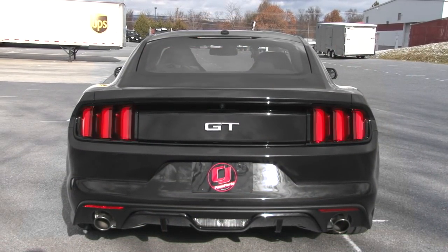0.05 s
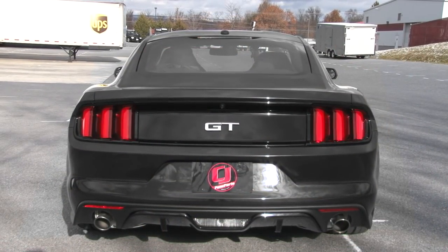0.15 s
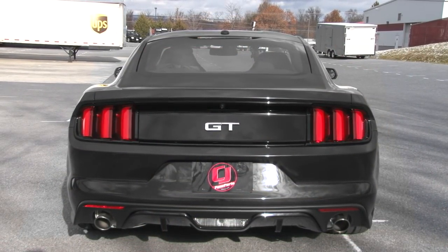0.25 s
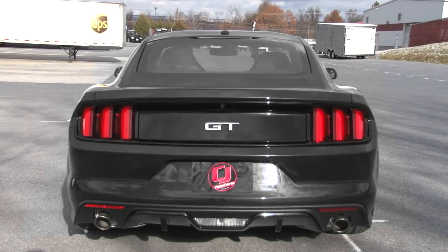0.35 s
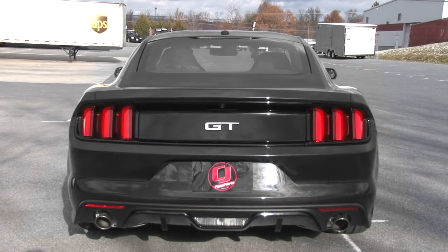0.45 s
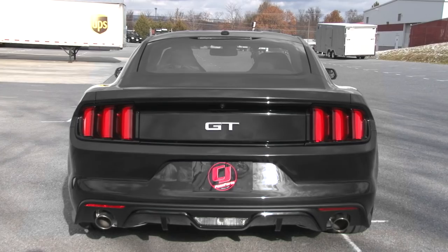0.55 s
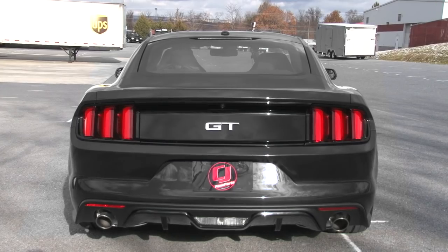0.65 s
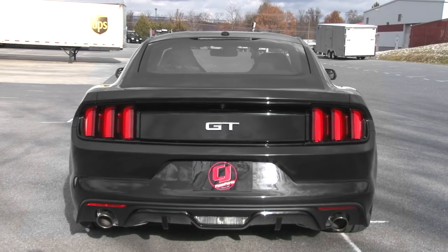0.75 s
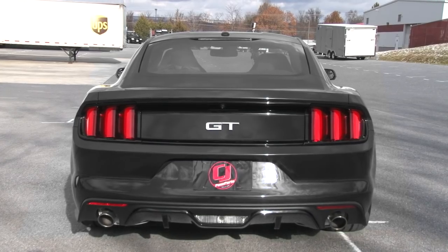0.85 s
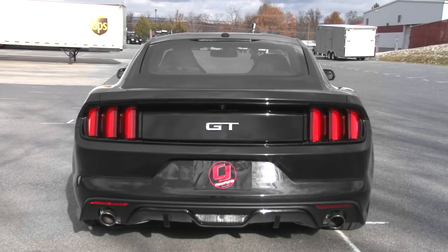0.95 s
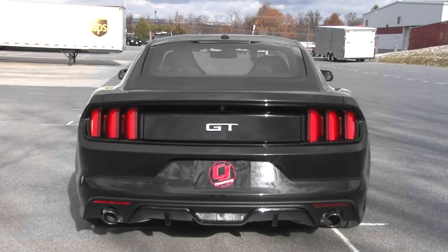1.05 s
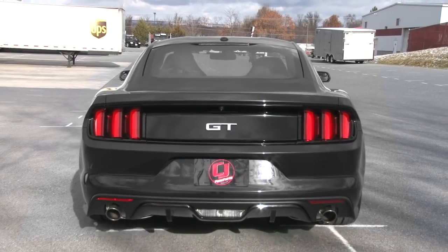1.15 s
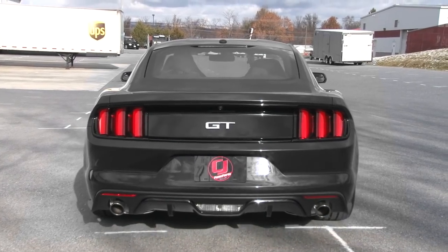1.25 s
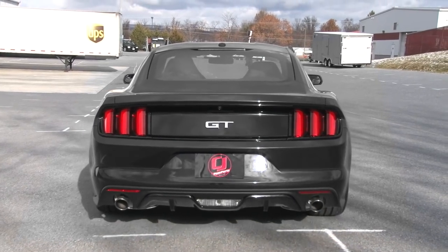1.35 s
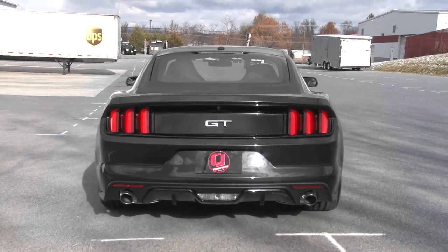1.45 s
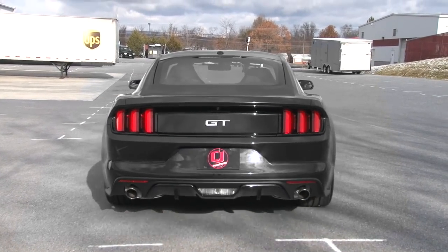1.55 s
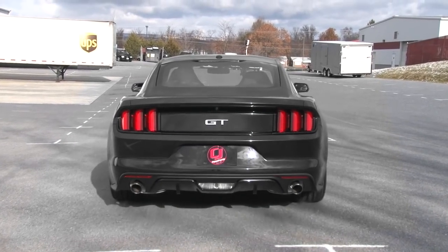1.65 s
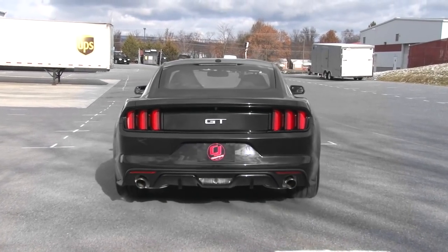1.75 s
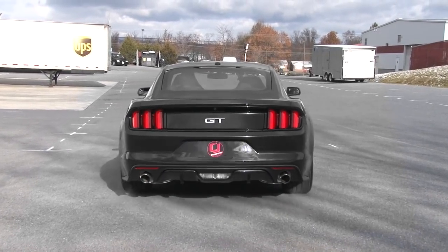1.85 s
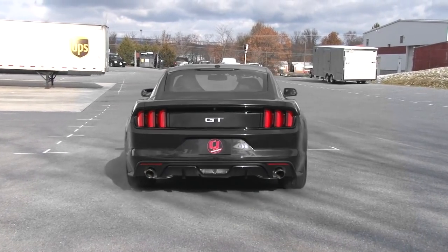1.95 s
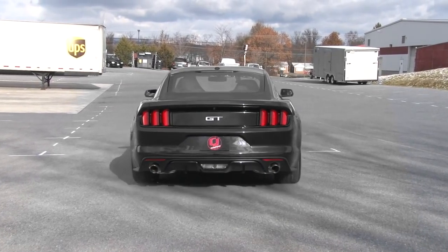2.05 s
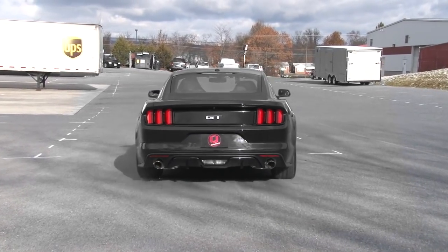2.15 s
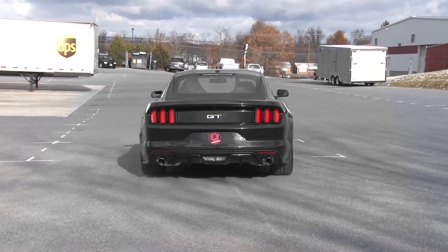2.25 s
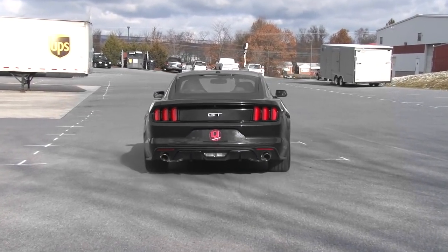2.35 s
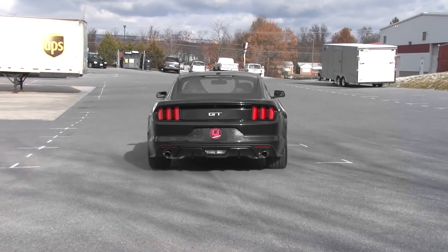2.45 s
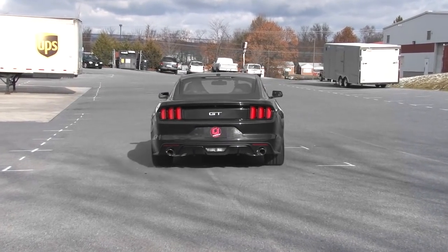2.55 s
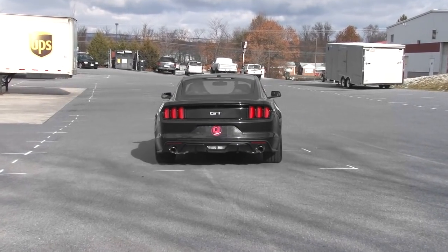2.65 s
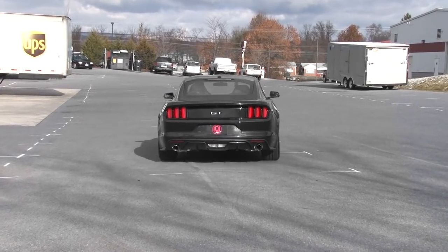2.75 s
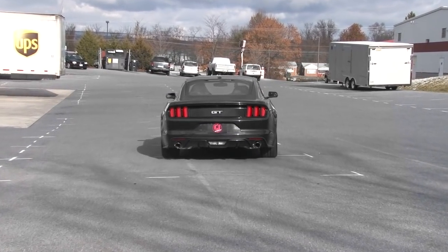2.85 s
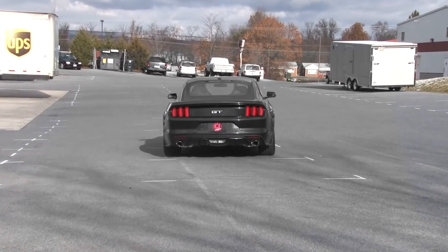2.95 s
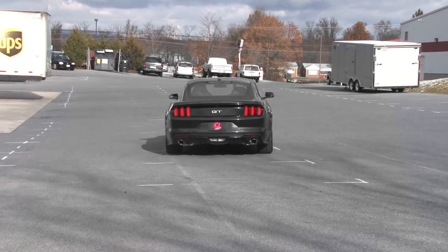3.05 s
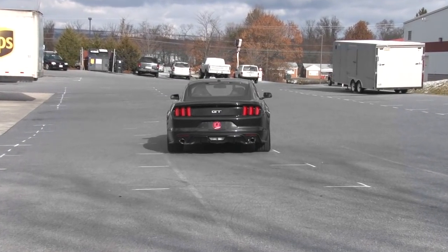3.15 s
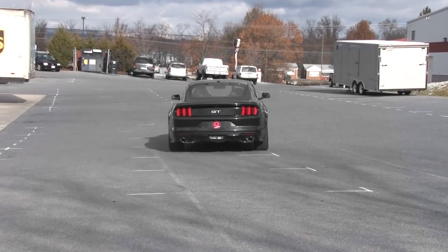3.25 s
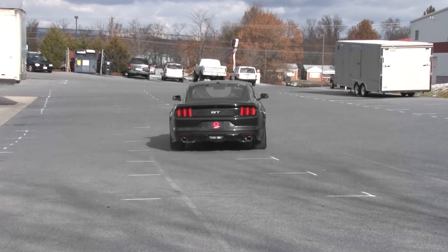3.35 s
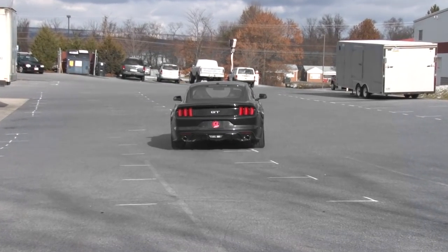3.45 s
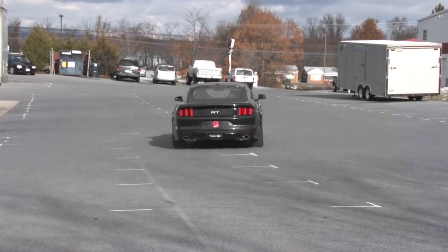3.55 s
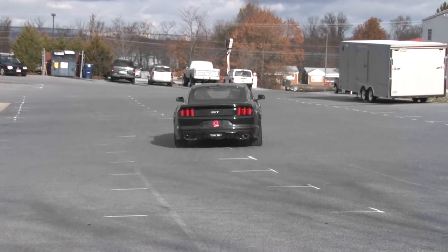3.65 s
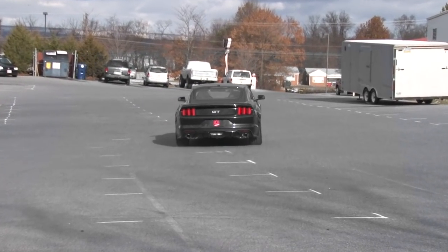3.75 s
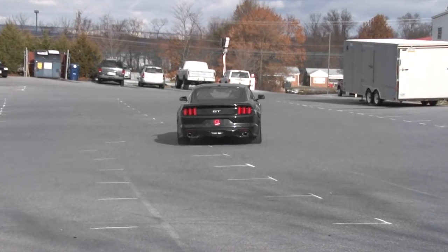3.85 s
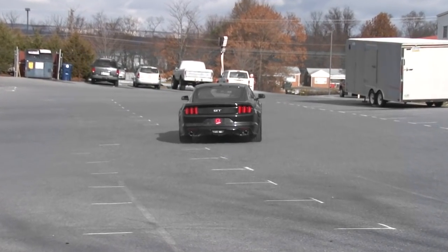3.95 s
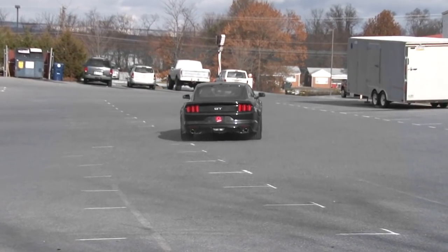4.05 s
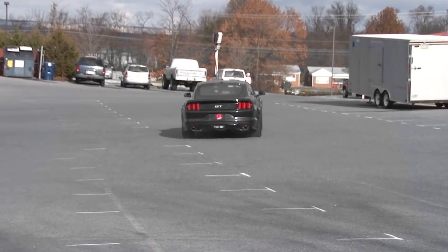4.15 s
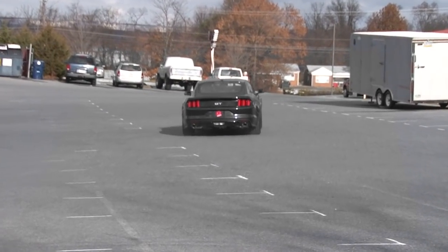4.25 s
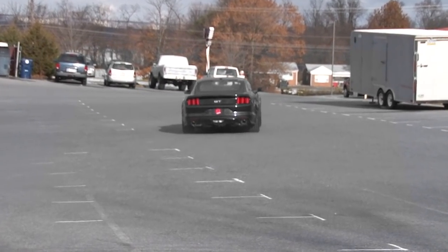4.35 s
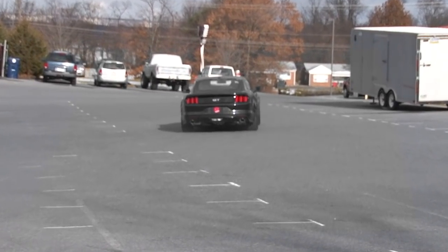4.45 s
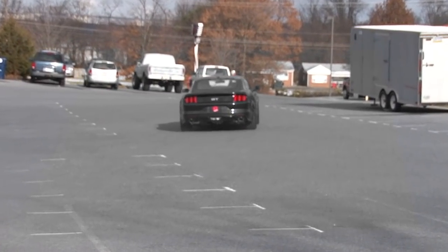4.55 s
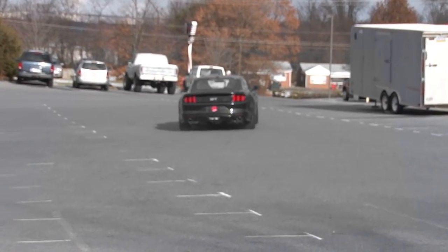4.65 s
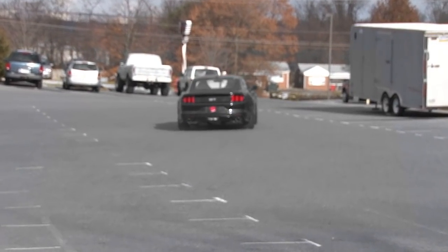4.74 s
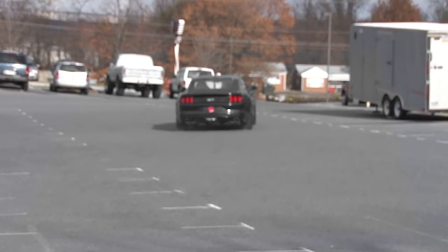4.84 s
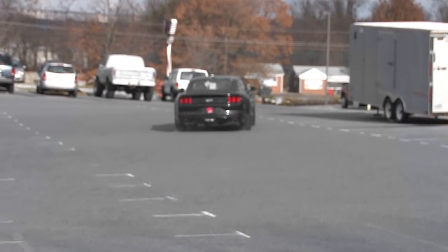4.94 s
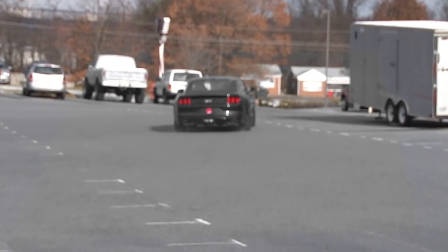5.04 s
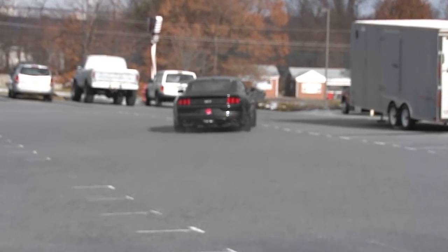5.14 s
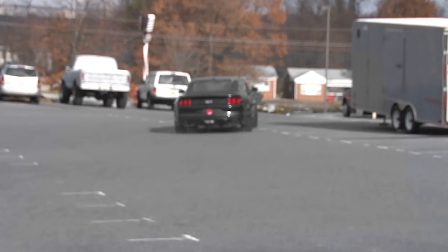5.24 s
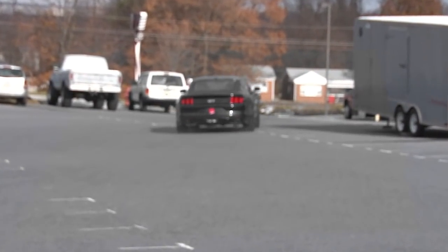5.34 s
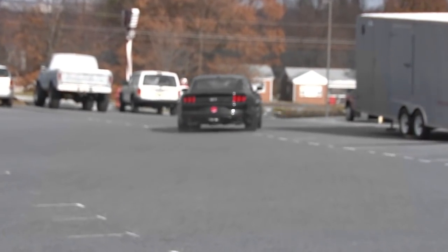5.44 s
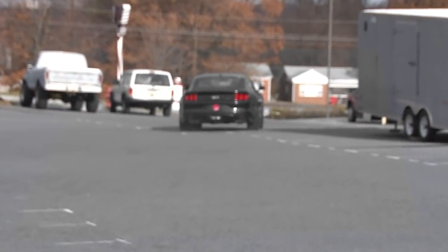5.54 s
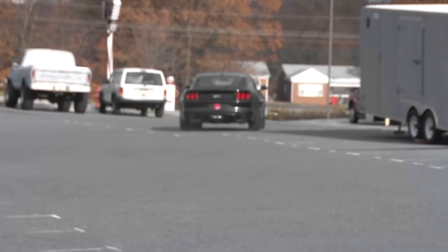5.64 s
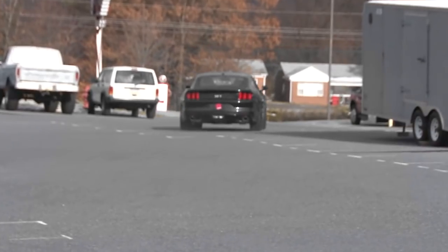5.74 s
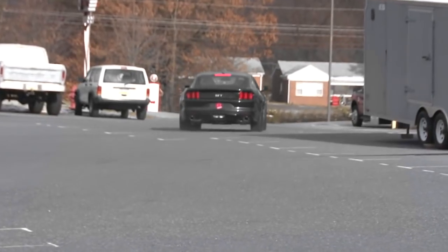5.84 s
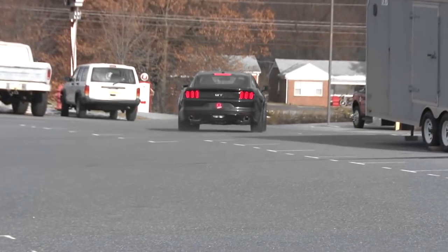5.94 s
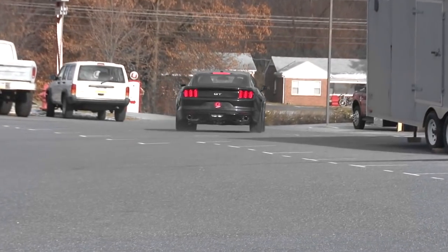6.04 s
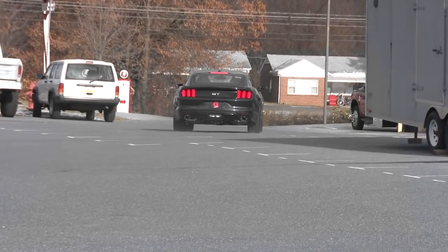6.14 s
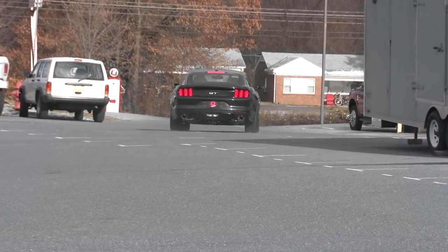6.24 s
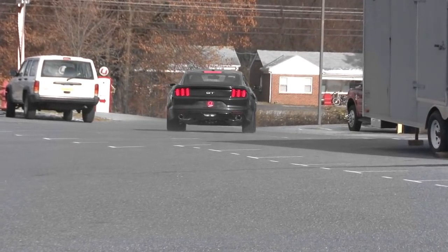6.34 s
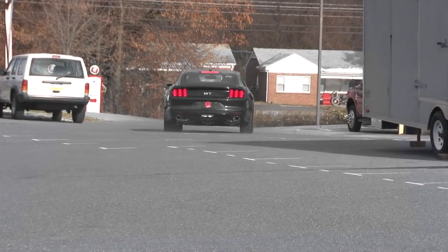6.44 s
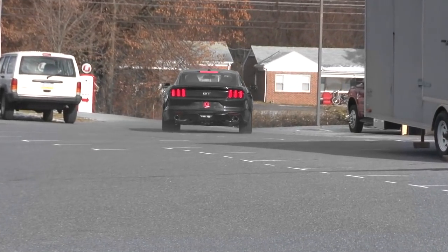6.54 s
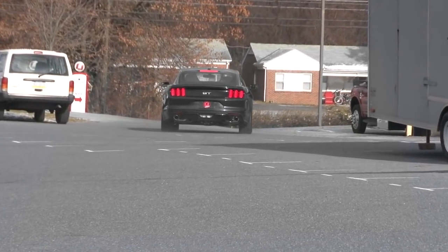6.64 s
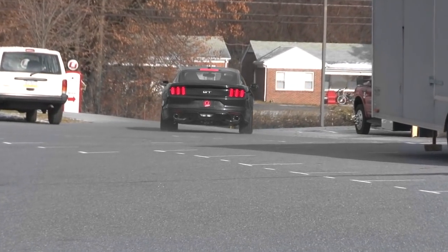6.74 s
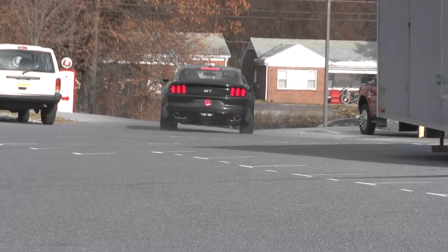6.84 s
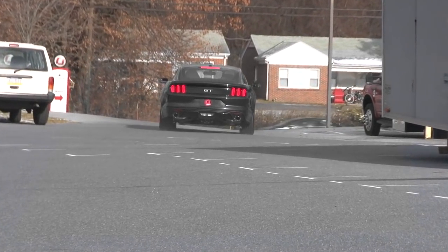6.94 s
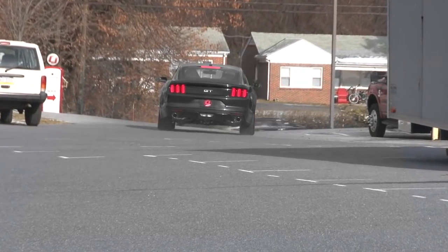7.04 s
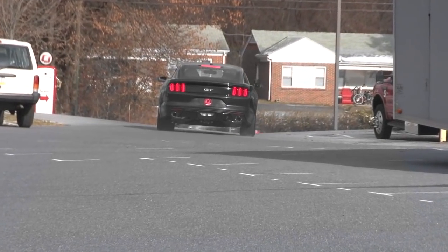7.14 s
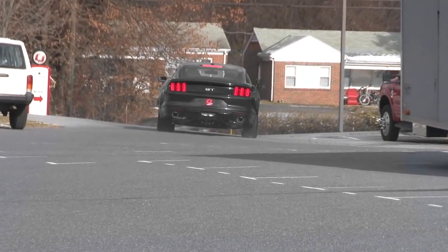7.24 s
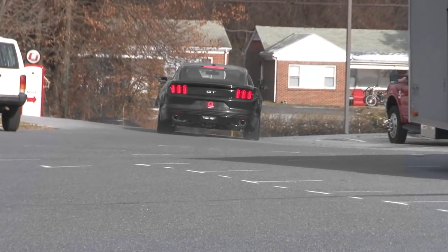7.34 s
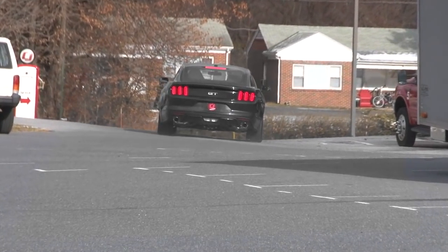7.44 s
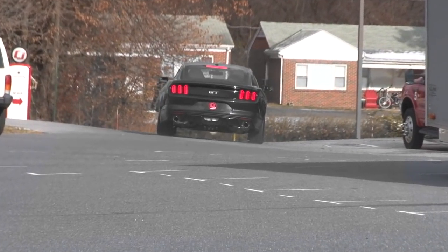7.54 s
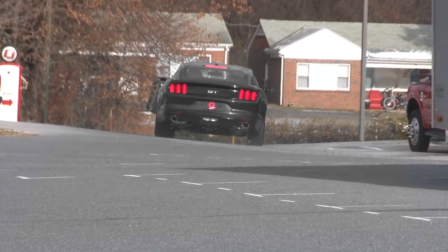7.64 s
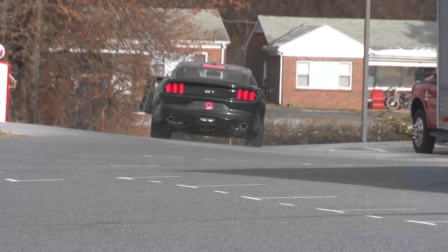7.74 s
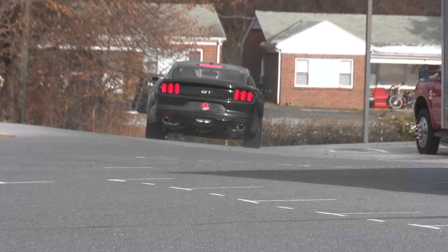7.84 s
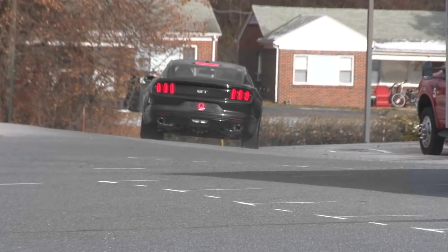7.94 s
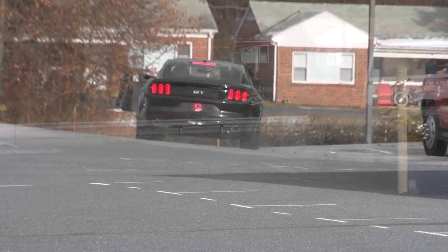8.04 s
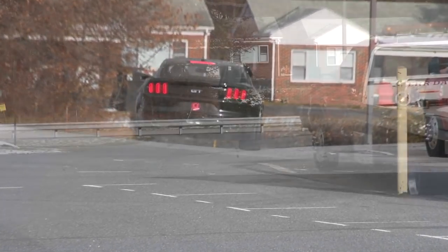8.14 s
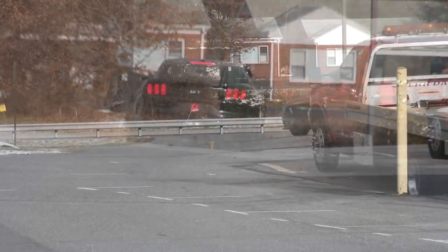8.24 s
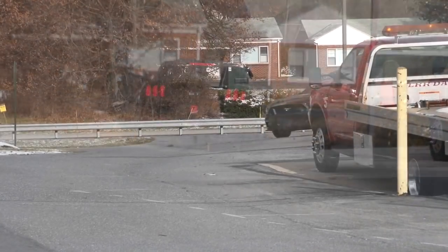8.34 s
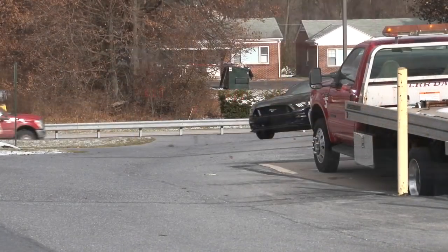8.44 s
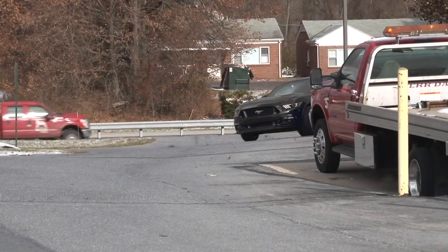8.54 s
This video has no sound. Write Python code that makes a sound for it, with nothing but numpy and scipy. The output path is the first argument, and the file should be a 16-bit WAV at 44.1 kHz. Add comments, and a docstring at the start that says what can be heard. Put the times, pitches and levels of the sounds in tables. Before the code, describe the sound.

Outdoor microphone behind a V8 car, dry with slight wall echoes. Lumpy idle, a sharp double rev, and held low rumble lead to stuttering tyre slips and flicked grit. A long rising exhaust roar becomes a hard metallic rasp, breaks off for a shift and tyre chirps, pulls briefly again, then fades with distance into rolling tyres, soft gusts and a faint drone.

```python
"""In an open asphalt yard, about 4 m from the microphone, a V8 coupe idles and its throttle is stabbed.
It launches with rear tyres hopping and flicking grit, pulls through first gear and chirps into second.
Then it coasts off to some 70 m; a faint drone swells at the end while the tyre roar dims, all over a breeze.
Shaped exhaust pulses ring pipe resonances, coloured noise makes gas, tyres and wind,
short noise bursts make barks and grit, and sines make the boom, whine and drone."""
import sys
import numpy as np
from scipy import signal
from scipy.fft import rfft, irfft, next_fast_len
from scipy.io import wavfile
from scipy.ndimage import map_coordinates

SR = 44100
rng = np.random.default_rng(int(sys.argv[2]) if len(sys.argv) > 2 else 0)


def dump_mix(stems):
    """Bounce the given channels to the path in sys.argv[1] as a 16-bit WAV at rate SR."""
    frames = np.atleast_2d(stems).T  # one column per channel
    limited = np.clip(frames, -1, 1)  # hard clip at full scale
    pcm = np.round(limited * 32767).astype(np.int16)
    wavfile.write(sys.argv[1], SR, pcm)


N = 378798

# Breeze on the microphone: (frequency [Hz], density [dB per Hz])
WIND_COLOUR = [(20, -39), (35, -1), (50, 3), (75, 2), (105, -7), (160, -15.5), (300, -21.5)]
# Gusts that swell and fade: (centre time [s], length [s], level [dB])
GUSTS = [(0.0, 0.74, -32.5), (6.197, 3.0, -41), (7.222, 0.45, -35.5), (7.804, 0.54, -32.5),
         (8.146, 0.58, -34.5)]
BREEZE_DB = -44  # steady part
# Echoes off trailers and walls: (delay [s], level [dB])
YARD_ECHOES = [(0.028, -18), (.074, -27.5), (0.126, -46)]
# Distance of the car from the microphone: (time [s], distance [m])
DISTANCE = [(0.9, 4), (2, 7), (3, 12), (4.3, 24), (7, 58), (8.59, 70)]

# Faint drone near the end: (time [s], frequency [Hz], level [dB])
DRONE = [(8.1, 312, -56), (8.3, 312, -47.5), (8.45, 302, -45.5), (8.59, 298, -43), (8.7, 306, -66)]
# Whine under the slipping clutch: (time [s], frequency [Hz], level [dB])
WHINE = [(1.02, 380, -70), (1.121, 393, -29.5), (1.38, 401.5, -28.5), (1.472, 389, -30.5), (1.54, 360, -43),
         (1.6, 366, -78)]

# Sharp grit ticks, before their ringing: (time [s], starting level [dB])
SHARP_GRIT = [(1.7846, -32), (2.2077, -37), (2.4451, -38), (3.451, -31), (4.061, -37), (4.8048, -34),
              (4.865, -42), (6.402, -40)]
# Faint ticks while the car pulls away: start, mean rate, level before ringing and distance loss, spread
GRIT_FROM_S, GRIT_PER_S, GRIT_DB, GRIT_SPREAD_DB, GRIT_LOSS_DB_PER_M = 2.2, 12, -49, 8, 0.25
# Slips of the hopping tyres: (start time [s], length [s], level [dB])
SLIPS = [(1.642, 0.058, -28), (1.686, 0.12, -23), (1.813, 0.055, -23.5), (1.841, 0.055, -28),
         (1.926, 0.086, -25.5), (2.034, 0.059, -30.5), (2.105, 0.064, -30.5), (2.153, 0.071, -34.5),
         (4.85, 0.15, -35), (4.926, 0.09, -26.5), (5.045, 0.079, -27), (5.165, 0.072, -28),
         (5.277, 0.083, -33.5)]
# Scrubbing rubber: (frequency [Hz], density [dB per Hz])
SCRUB_COLOUR = [(450, -3), (680, 4.5), (790, -1), (950, 7.5), (1060, -1), (1250, 1), (1550, 0.5),
                (1850, -1), (2400, -8.5), (3700, -12.5), (5000, -22), (7000, -28.5), (11000, -35.5),
                (15700, -40.5)]
# Rolling tyre colour: (frequency [Hz], density [dB per Hz])
ROLL_COLOUR = [(130, 2.5), (220, -0.5), (450, -1.5), (650, 2), (880, 6), (1150, -1.5), (1600, -9),
               (2000, -14.5), (2600, -19)]
# Rolling tyre level: (time [s], level [dB])
ROLL_LEVEL = [(1.5, -56), (3.5, -36), (4.9, -35.5), (6.05, -36.5), (6.9, -40.4), (7.3, -37), (8.15, -40.5),
              (8.4, -49.5)]

# Low, middle and high gas noise, each: (frequency [Hz], density [dB per Hz])
ROAR_COLOUR = [(450, 2), (700, -0.5), (1000, -1), (1300, -1), (1600, -7), (2000, -10), (2600, -30.5)]
RUSH_COLOUR = [(1600, 0.5), (2100, -1), (2450, -1), (2800, -1), (3150, -4), (3600, -4.5), (4100, -8),
               (4700, -11.5), (5500, -15), (6800, -49.5)]
HISS_COLOUR = [(4500, 0.5), (5600, -4.5), (6800, 0), (7700, -6), (8600, -4.5), (9600, -8), (13000, -9),
               (15700, -15.5)]
# Their levels, each: (level at cruising speed and 0 m [dB], rise [dB per octave of revs], loss [dB per m])
ROAR_LAW = (-43, 9.6, 0.23)
RUSH_LAW = (-51.5, 7.4, 0.18)
HISS_LAW = (-57, 5.8, 0.38)

# Engine speed: (time [s], rate [cycles of eight firings per s])
ENGINE_SPEED = [(0.0, 8.8), (0.55, 9.8), (1.08, 21.83), (1.41, 22.4), (1.77, 17.57), (2.0, 20.04),
                (2.39, 19.83), (2.56, 22.6), (3.77, 41.03), (4.3, 48.13), (4.46, 46.3), (4.8, 42.47),
                (4.95, 36.93), (5.18, 39.4), (5.56, 36.86), (5.74, 39.01), (6.12, 35.95), (7.0, 25.5),
                (7.8, 19.8), (8.15, 22.4)]
CRUISE_CYCLES_PER_S = 22
# Unequal cylinders fill in the orders, strengths before brightening:
# (multiple of the cycle rate, then strength in each duty in the order of DUTIES [dB] x 4)
ORDER_STRENGTHS = [(1.0, 4.5, -64.5, 8, -8.5), (2.0, 9, 5.5, 7.5, 16.5), (3.0, -43, -9, -0.5, 3.5),
                   (4.0, 4, 1, -8.5, 3.5), (5.0, -1.5, 0, 7, -4.5), (6.0, 7, 6.5, 0, 10.5),
                   (7.0, 9, -4, -7, -0.5), (8.0, 16.5, 8.5, 3.5, 6), (9.0, -6, 5.5, -28.5, 15.5),
                   (10.0, 9.5, 1, 10.5, 11), (11.0, -14, 3.5, -4, 7.5), (12.0, -1.5, 0.5, -5, 5.5),
                   (13.0, 6.5, -5.5, 4, 9), (14.0, 9, 8, -19, 6), (15.0, -6, 4.5, 5.5, -3),
                   (16.0, 6, -4.5, -10, -2), (17.0, -7.5, 2.5, -19, -7), (18.0, 3.5, -10.5, 3, 7.5),
                   (19.0, 0, -0.5, -6, 8), (20.0, -20, -1, 4, 7.5), (21.0, 1.5, -16, -8, 6),
                   (22.0, 7, 4, 3, -19)]
# Exhaust pipe resonances: (frequency [Hz], width [Hz], gain [dB])
PIPE_RESONANCES = [(55.5, 3.9, -7.5), (137.8, 40, -2.5), (232.3, 36.6, -1.3), (349.2, 21.4, -6.5),
                   (398.4, 31.4, -5.5), (490, 59, -5), (749.5, 60, -12), (917, 133, -23)]
# Names of the engine's four working conditions: (duty)
DUTIES = ["part throttle", "first gear", "overrun", "second gear"]
# Engine settings (idle, launch, bog, full pull, lift, clutch closes, short pull, lift, coast, duller at the end),
# each held until the next: (time [s], glide [s], duty, pulse level before the pipes [dB],
# swell [dB per s], brightness before low-rev dulling [dB per octave], rasp level [dB])
PEDAL = [(0.0, 0.01, "part throttle", -48.5, 6, 2, -48), (0.6, 0.19, "part throttle", -32.5, -3, -1.5, -31),
         (2.05, 0.25, "part throttle", -42, 5, 2, -33.5), (2.42, 0.084, "first gear", -35, 4.5, 2.5, -31.5),
         (4.33, 0.11, "overrun", -41.5, 13, 1, -39), (4.77, 0.019, "overrun", -44.5, 0, 5, -35.5),
         (4.82, 0.037, "second gear", -36.5, -1.5, 2.5, -33.5),
         (5.8, 0.2, "second gear", -50.5, -7, -1.5, -44), (6.3, 0.38, "overrun", -49, -11, 2.5, -46.5),
         (7.9, 0.2, "first gear", -49, -4, -5, -50)]
# Stabs of throttle: (centre time [s], length [s], pulse level before the pipes [dB], rasp level [dB])
BLIPS = [(0.0, 0.37, -38.5, -47), (0.47, 0.14, -27, -36.5), (0.584, 0.13, -28.5, -31.5)]
# Brightness lost: [dB per octave] per octave of revs below cruising; [dB per octave] at the top of a stab
LOW_REV_DULLING_DB, BLIP_DULLING_DB = 5, 0.5
# First hard firings as the throttle opens, before the pipes: (time [s], starting level [dB])
BARKS = [(0.036, -17.5), (0.492, -15), (0.563, -10), (0.572, -12), (0.606, -25)]
# Turbulence behind the rasp: (frequency [Hz], density [dB per Hz])
RASP_COLOUR = [(80, -8), (120, -7.5), (200, 5), (290, 9.5), (380, 7.0), (500, 13.5), (700, -21.0), (1000, -22)]
TIP_RING_DB = -6  # gain of the steel tips' ring
BOOM_AT_S, BOOM_LENGTH_S, BOOM_DB = 3.07, 1.86, -37.5  # early in first gear
CUTOFF_HZ = 15750


def from_db(db):
    """Decibels to gain."""
    return 10 ** (np.asarray(db) / 20)


def rms_one(x):
    """Scale to unit rms."""
    return x / np.sqrt(np.mean(x ** 2) + 1e-20)


def in_time(rows):
    """Interpolate each column of a time table, sample by sample."""
    s, *columns = np.transpose(rows)
    return [np.interp(np.arange(N) / SR, s, column) for column in columns]


def swell(s, length):
    """A smooth rise and fall of height 1, centred on s."""
    phase = np.clip((np.arange(N) / SR - s) / length, -.5, .5)
    return np.cos(np.pi * phase) ** 2


def drift(rate):
    """Smooth random wander with about `rate` turns a second; spread 1."""
    r = np.exp(-40 * np.pi * rate / SR)  # made at one twentieth of the sample rate
    chance = rng.standard_normal(N // 20 + 2002)
    slow = signal.lfilter([1], [1, -2 * r, r * r], chance)[2000:]  # drop the filter's start
    return np.interp(np.arange(N) / 20, np.arange(len(slow)), rms_one(slow))


def noise(colour):
    """Noise of the given colour, falling 36 dB per octave beyond its ends; rms 1."""
    size = next_fast_len(N)
    octave = np.log2(np.maximum(np.fft.rfftfreq(size, 1 / SR), 1))
    hz, db = np.transpose(colour)
    beyond = abs(octave - np.clip(octave, np.log2(hz[0]), np.log2(hz[-1])))
    gain = from_db(np.interp(octave, np.log2(hz), db) - 36 * beyond)
    return rms_one(irfft(rfft(rng.standard_normal(size)) * gain, size)[:N])


def resonate(x, hz, width):
    """One resonance with gain 1 on top."""
    r = np.exp(-np.pi * width / SR)
    feed = np.array([1, 0, -1]) * (1 - r * r) / 2
    feedback = [1, -2 * r * np.cos(2 * np.pi * hz / SR), r * r]
    return signal.lfilter(feed, feedback, x + 1e-18)


def bursts(rows, decay_s):
    """Noise bursts that start at once and die away exponentially."""
    out, age = np.zeros(N), np.arange(SR // 10) / SR
    for s, db in rows:
        at = int(s * SR)
        burst = from_db(db) * np.exp(-age / decay_s) * rng.standard_normal(len(age))
        out[at:at + len(age)] += burst[:N - at]
    return out


def breeze():
    """Wind noise rumbles on the microphone; the power of each gust adds to the steady breeze."""
    gusts = sum(from_db(db) ** 2 * swell(s, length) for s, length, db in GUSTS)
    return np.sqrt(from_db(BREEZE_DB) ** 2 + gusts) * noise(WIND_COLOUR)


def yard(x):
    """Trailers and walls return a few delayed echoes with the treble dulled."""
    dull = signal.sosfilt(signal.butter(1, 2500, fs=SR, output="sos"), x)
    echoes = sum(from_db(db) * np.pad(dull, (int(s * SR), 0))[:N] for s, db in YARD_ECHOES)
    return x + echoes


def tone(rows):
    """A sine of gliding pitch and wavering level fades in and out."""
    hz, db = in_time(rows)
    sounding = db > max(rows[0][2], rows[-1][2]) + .1  # silent outside the fades
    level = from_db(db + 2.2 * drift(19))
    return sounding * level * np.sqrt(2) * np.sin(2 * np.pi * np.cumsum(hz) / SR)


def grit():
    """Tiny stones tick on the asphalt as ringing bursts, the faint ones losing level with distance."""
    gaps, sizes = rng.exponential(1, 200), rng.normal(0, 1, 200)
    s = GRIT_FROM_S + np.cumsum(gaps) / GRIT_PER_S
    metres = np.interp(s, *np.transpose(DISTANCE))
    db = GRIT_DB + GRIT_SPREAD_DB * np.minimum(sizes, 2) - GRIT_LOSS_DB_PER_M * metres
    faint = [row for row in zip(s, db) if row[0] < N / SR]
    ticks = bursts(SHARP_GRIT + faint, decay_s=.0015)
    return resonate(resonate(ticks, 12500, 4000), 12500, 4000)


def rolling_tyres():
    """Rolling tyres make a steady coloured roar whose level follows a curve."""
    return from_db(in_time(ROLL_LEVEL)[0]) * noise(ROLL_COLOUR)


def hopping_tyres():
    """The rear tyres scrub the asphalt in a swelling burst of noise at each slip."""
    t = np.arange(N) / SR
    power = np.zeros(N)
    for s, length, db in SLIPS:
        span = slice(int(s * SR), int((s + length) * SR))
        progress = np.clip((t[span] - s) / length, 0, 1)
        power[span] += from_db(db) ** 2 * np.sin(np.pi * progress ** 0.75) ** 2
    rubber = noise(SCRUB_COLOUR)
    body = signal.sosfilt(signal.butter(2, 2300, fs=SR, output="sos"), rubber)
    # hard slips tear brightly; light or later, more distant ones keep more of the throaty body
    hardness = (power / power.max()) ** 0.067 / np.maximum(t / 2, 1)
    scrub = hardness * rubber + (1 - hardness) * body
    return np.sqrt(power) * scrub * from_db(1.0 + 1.8 * drift(150))


def octaves_above_cruise():
    """Engine speed in octaves from cruising speed."""
    return np.log2(in_time(ENGINE_SPEED)[0] / CRUISE_CYCLES_PER_S)


def puffs(turns, cycle_depth, firing_depth):
    """Gas leaves in puffs, one per cylinder, strongest once a cycle; rms 1."""
    angle = 2 * np.pi * turns
    per_cylinder = np.cos(8 * angle)
    return rms_one(np.exp(cycle_depth * np.cos(angle + 2.45) + firing_depth * per_cylinder))


def gas_rush(turns):
    """Gas noise throbs with the engine, grows with the revs and fades with distance."""
    revs, (metres,) = octaves_above_cruise(), in_time(DISTANCE)
    laws = (ROAR_LAW, RUSH_LAW, HISS_LAW)
    roar, rush, hiss = (from_db(db + rise * revs - loss * metres) for db, rise, loss in laws)
    low = roar * noise(ROAR_COLOUR) * puffs(turns, cycle_depth=0.19, firing_depth=0.14)
    top = rush * noise(RUSH_COLOUR) + hiss * noise(HISS_COLOUR)
    return low + top * puffs(turns, cycle_depth=0.094, firing_depth=0.083)


def boom(turns):
    """The half-firing beat of each bank, a sine at twice the cycle rate, booms in the pipes' low range."""
    beat = np.sqrt(2) * np.sin(2 * np.pi * 2 * turns)
    return from_db(BOOM_DB) * swell(BOOM_AT_S, BOOM_LENGTH_S) * beat


def effort():
    """Duty, pulse level, brightness and rasp glide to each engine setting, and the blips ride on top."""
    t, state = np.arange(N) / SR, np.zeros((4, N))
    for i, (s, glide, duty, pulse_db, swell_db, bright_db, rasp_db) in enumerate(PEDAL):
        share = np.clip((t - s) / glide, 0, 1) if i else 1
        goals = (DUTIES.index(duty), pulse_db + swell_db * (t - s), bright_db, rasp_db)
        for now, goal in zip(state, goals):
            now += share * (goal - now)
    duty, pulse_db, bright_db, rasp_db = state
    for s, length, blip_db, blip_rasp_db in BLIPS:
        stab = swell(s, length)
        pulse_db += stab * (blip_db - pulse_db)
        rasp_db += stab * (blip_rasp_db - rasp_db)
        bright_db -= stab * BLIP_DULLING_DB
    bright_db = bright_db + LOW_REV_DULLING_DB * np.minimum(octaves_above_cruise(), 0)
    return duty, pulse_db, bright_db, rasp_db


def cycle_shape(order_db, upper_db, size=1024):
    """Pressure over one engine cycle: the blows build up to the strongest, then a lull follows."""
    k = np.arange(size // 2 + 1)
    level = upper_db - 4 * np.log2(np.maximum(k, 24) / 24) + rng.normal(0, 2.5, len(k))
    level[1:len(order_db) + 1] = order_db
    # folding the cepstrum gives minimum phase; the conjugate reverses it in time
    cepstrum = irfft(np.log(from_db(level)))
    cepstrum[1:size // 2] *= 2
    cepstrum[size // 2 + 1:] = 0
    return np.exp(rfft(cepstrum)).conj()  # complex strength of each order


def firing(turns, duty, bright_db, count=56, size=1024):
    """Exhaust pulses: the cycle shape follows the duty, and its spectral slope follows the brightness."""
    k = np.arange(count)
    columns = np.transpose(ORDER_STRENGTHS)[1:]
    orders = np.array([cycle_shape(column, upper_db=-4.0)[:count] for column in columns])
    orders = orders * (k > 0)  # no steady pressure
    orders[:, 8] *= 1j  # cylinders differ in timing as well as in strength
    slopes = np.arange(-12, 13)  # dB per octave about the eighth order
    tilt = from_db(slopes[:, None] * np.log2(np.maximum(k, 1) / 8))
    shapes = irfft(orders[:, None] * tilt, size) * size / np.sqrt(2)
    shapes = np.concatenate([shapes, shapes[..., :1]], axis=-1)  # close the cycle
    place = [duty, bright_db - slopes[0], turns % 1 * size]
    return map_coordinates(shapes, place, order=1, mode="nearest")


def pipe(x):
    """The exhaust's resonances ring in parallel, signs alternating."""
    return sum((-1) ** i * from_db(db) * resonate(x, hz, width)
               for i, (hz, width, db) in enumerate(PIPE_RESONANCES))


def exhaust(turns, duty, pulse_db, bright_db, rasp_db):
    """Slightly uneven pulses, turbulent rasp and first barks ring the pipes, and gas rings the tips."""
    pulses = firing(turns, duty, bright_db) * from_db(pulse_db + 0.36 * drift(50))
    # from 31 to 40 cycles per s the blows bunch into one throb a cycle
    bunching = np.interp(in_time(ENGINE_SPEED)[0], [31, 40], [0, .85])
    throb = (1 + bunching * np.cos(2 * np.pi * (turns + .06))) / (1 + .35 * bunching)

    turbulence = noise(RASP_COLOUR)
    rasp = rms_one(pipe(turbulence)) + from_db(-6.5) * turbulence
    rasp = rasp * puffs(turns, cycle_depth=0.14, firing_depth=0.54)
    rasp = from_db(rasp_db) * rms_one(rasp)

    blows = bursts(BARKS, decay_s=0.0077)
    barks = from_db(12) * resonate(pipe(blows), 180, 150) + from_db(-12.0) * resonate(blows, 1280, 310)

    # each throb makes the steel tips sing
    gas = rng.standard_normal(N) * throb * bunching * from_db(pulse_db)
    tip_ring = from_db(TIP_RING_DB) * (resonate(gas, 2750, 220) + resonate(gas, 3570, 220))
    return pipe(pulses) * throb + rasp + barks + tip_ring


def scene():
    """The car sounds in the echoing yard, and the breeze at the microphone."""
    turns = np.cumsum(in_time(ENGINE_SPEED)[0]) / SR + 0.0024 * drift(28)  # engine cycles, with jitter
    wind = breeze()
    tones = tone(DRONE) + tone(WHINE)
    tyres = grit() + rolling_tyres() + hopping_tyres()
    engine = gas_rush(turns) + boom(turns) + exhaust(turns, *effort())
    return (yard(tones + tyres + engine) + wind)[None]


def record(dry):
    """The microphone signal loses its deepest bass and its extreme top."""
    dry = signal.sosfilt(signal.butter(2, 25, "high", fs=SR, output="sos"), dry)
    return signal.sosfilt(signal.ellip(12, .1, 80, CUTOFF_HZ, fs=SR, output="sos"), dry)


dry = scene()
out = record(dry)
dump_mix(out)
```